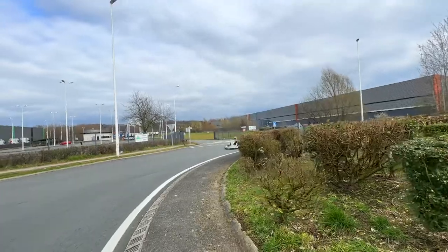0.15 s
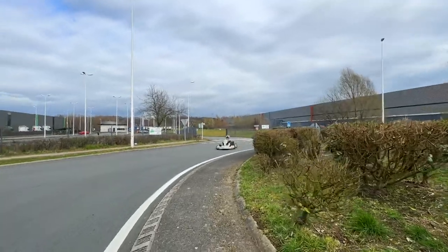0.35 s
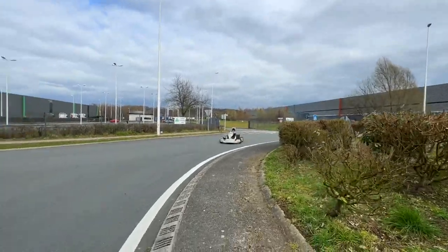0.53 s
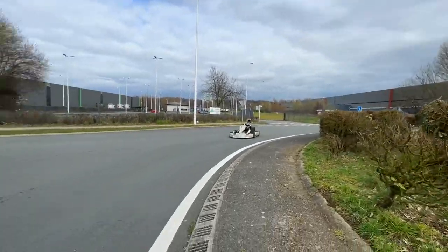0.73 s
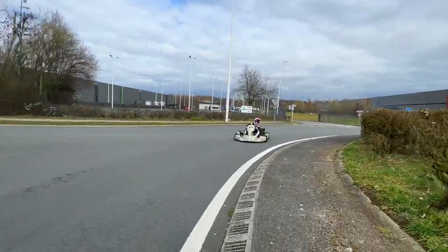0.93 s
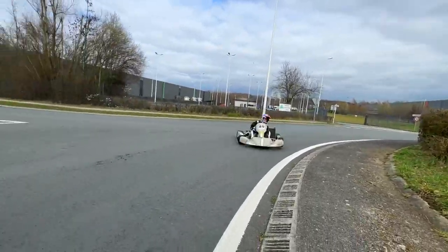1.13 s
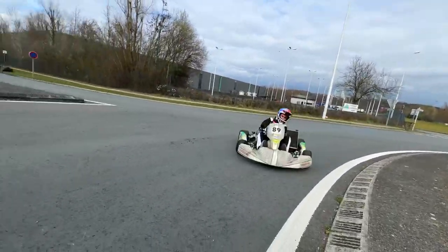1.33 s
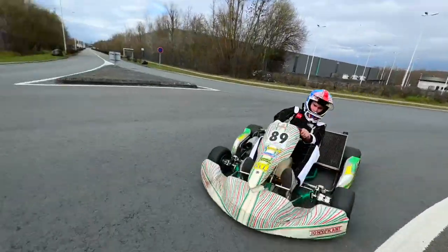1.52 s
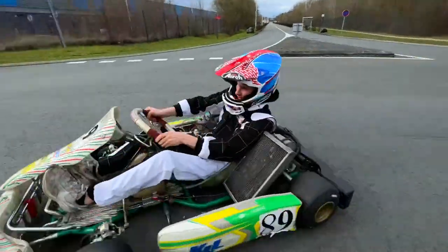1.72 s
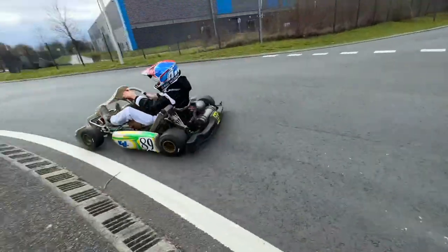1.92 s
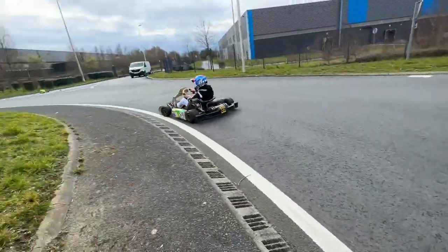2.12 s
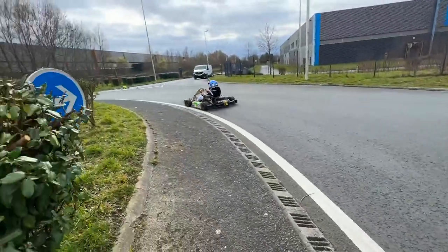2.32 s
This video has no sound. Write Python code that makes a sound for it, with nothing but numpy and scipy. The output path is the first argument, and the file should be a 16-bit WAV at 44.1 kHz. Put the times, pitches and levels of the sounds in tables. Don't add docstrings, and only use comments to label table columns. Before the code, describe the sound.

Racing kart on an open asphalt bend, heard from the kerb on a phone: distant sputtering, sudden throttle, loud raspy pass with tiny tyre squeals, then a falling note that picks up again as it leaves.

```python
import sys
import numpy as np
from scipy import signal
from scipy.fft import rfft, irfft, next_fast_len
from scipy.io import wavfile

SR = 44100
rng = np.random.default_rng(int(sys.argv[2]) if len(sys.argv) > 2 else 0)


def persist_wave(psi):
    counts = np.round(np.clip(psi, -1, 1) * 32767).astype(np.int16)
    wavfile.write(sys.argv[1], SR, np.atleast_2d(counts).T)


def rack_gain(trim_db):
    fader = np.asarray(trim_db, float)
    return 10 ** (fader / 20)


N = 104031
PADDED = next_fast_len(N)


def in_time(rows):
    s, *columns = np.transpose(rows)
    return [np.interp(np.arange(N) / SR, s, c) for c in columns]


def at_hz(points, hz):
    p = np.array(points)
    return np.interp(np.log(hz + 1e-3), np.log(p[:, 0] + 1e-3), p[:, 1])


def rms_one(x):
    return x / np.sqrt(np.mean(x ** 2) + 1e-20)


def drift(rate_hz):
    pole = np.exp(-80 * np.pi * rate_hz / SR)
    white = rng.standard_normal(N // 40 + 1002)
    slow = signal.lfilter([1], [1, -2 * pole, pole * pole], white)[1000:]
    limited = 2.5 * np.tanh(rms_one(slow) / 2.2)
    return np.interp(np.arange(N) / 40, np.arange(len(slow)), limited)


def noise(spectrum, gate, patchy_db):
    # frequency in Hz, share of noise power common to both ports.
    common_share = [(30, .15), (100, 0.83), (300, 1), (700, 0.48), (1500, 0.47), (4000, 0.34), (8000, 0.42),
                    (12000, 0.27)]
    hz = np.fft.rfftfreq(PADDED, 1 / SR)
    lowest, highest = spectrum[0][0], spectrum[-1][0]
    shape = rack_gain(at_hz(spectrum, hz)) * (hz > lowest) * (hz < highest)
    share = np.clip(at_hz(common_share, hz), 0, 1)
    split = np.sqrt([share, 1 - share, 1 - share])
    coloured = rfft(gate * rng.standard_normal((3, N)), PADDED) * shape * split
    octave = np.log2(hz + 1)
    together = drift(11)
    out = np.zeros((3, N))
    for centre in np.arange(np.floor(np.log2(lowest)), np.log2(highest) + 1, 1):
        band = np.clip(1 - abs(octave - centre), 0, 1)
        patches = rack_gain(patchy_db * (0.75 * together + drift(16.3)))
        out += irfft(coloured * band, PADDED)[:, :N] * patches
    return out / np.sqrt(np.mean(out[0] ** 2 + out[1] ** 2))


def tyre_rumble():
    # frequency in Hz, density in dB per Hz.
    road_spectrum = [(13, -51), (22, -35), (75, -7.5), (129, -13), (170, -12), (220, -60.5), (370, -120)]
    # time in seconds, level in dB.
    roll = [
        (0.04, -57),
        (0.13, -61),
        (0.36, -54),
        (0.46, -52.5),
        (1.26, -51.5),
        (1.29, -35.5),
        (1.5, -44),
        (1.56, -37),
        (2.36, -53),
    ]
    roll_db, = in_time(roll)
    return rack_gain(roll_db + 4.5) * noise(road_spectrum, 1, patchy_db=2.5)


def tyre_scrubs():
    # start in seconds, length in seconds, pitch in Hz, level in dB.
    squeals = [
        (1.815, .065, 2600, -24),
        (1.565, .045, 2500, -27),
    ]
    half_width_hz = 160
    out, t = np.zeros(N), np.arange(N) / SR
    for start, length, hz, db in squeals:
        edges = [hz - half_width_hz, hz + half_width_hz]
        sos = signal.butter(2, edges, "band", fs=SR, output="sos")
        squeal = rms_one(signal.sosfilt(sos, rng.standard_normal(N)))
        swell = np.interp(t - start, [0, .02, length, length + 0.0098], [0, 1, 1, 0])
        out += rack_gain(db) * swell * squeal
    return out


def chain_and_intake_hiss(gate, rasp_db, hiss_db, top_db):
    # frequency in Hz, density in dB per Hz.
    hiss_spectrum = [(2800, -22), (4300, -3), (5200, -3.5), (7000, -6), (10000, -3.5), (13000, -2),
                     (16000, -4)]
    hiss = rack_gain(rasp_db) * noise(hiss_spectrum, gate, patchy_db=1.1)
    split_hz = 11500
    low = signal.butter(8, split_hz, "low", fs=SR, output="sos")
    high = signal.butter(8, split_hz, "high", fs=SR, output="sos")
    body = rack_gain(hiss_db + 6.5) * signal.sosfilt(low, hiss)
    top = rack_gain(top_db + 10.5) * signal.sosfilt(high, hiss)
    return body, top


def exhaust_rasp(gate, rasp_db):
    # frequency in Hz, density in dB per Hz.
    rasp_spectrum = [(71, -76), (120, -27.5), (227, -7.5), (317, -13.5), (453, -10), (578, -12.5),
                     (710, -12.5), (2390, -14.5), (10500, -32), (13600, -86.5), (22000, -120)]
    return rack_gain(rasp_db + 3.0) * noise(rasp_spectrum, gate, patchy_db=1.5)


def pipe_db(hz, ring_db):
    chamber = (2 + ring_db) / (1 + (2 * (hz - 1093) / 210) ** 2)
    stinger = 3 / (1 + (2 * (hz - 2450) / 900) ** 2)
    return chamber + stinger


def exhaust(rate_hz, turns):
    # time in seconds, exhaust note in dB, second order in dB, upper orders in dB.
    drive = [(0.04, -39, -36, -42), (0.2, -34.5, -42.5, -45.5), (0.46, -39.5, -39, -32),
             (0.51, -25, -37.5, -31.5), (0.78, -25, -20.5, -30.5), (0.98, -23.5, -20.5, -27),
             (1.27, -13.5, -18.5, -21.5), (1.38, -19.5, -25, -19), (1.44, -13, -19.5, -24),
             (1.61, -19, -25, -21), (1.64, -14, -18, -31), (1.78, -21, -25, -19.5), (1.81, -17, -26, -19),
             (1.87, -30.5, -42, -23), (1.93, -24, -20.5, -30.5), (1.98, -25.5, -31.5, -29.5),
             (2.3, -30.5, -26.5, -25.5), (2.36, -60, -40, -33)]
    # time in seconds, how hard the chamber rings in dB, unevenness of the path as a factor.
    ring = [(.04, -3, 2.2), (.285, -2, 2.2), (.31, 15, 1.2), (.46, 14, 1.6), (.5, 1, 1.6), (.6, 0, 1.0),
            (1.25, 0, .9), (1.4, 2, 2.4), (2.06, 0, 2.4), (2.2, 2, 1.1), (2.36, 3, 1.1)]
    # multiple of the firing rate, level in dB.
    strong_orders = [
        (1, 1),
        (2, 0),
        (3, -6),
        (4, -8),
    ]
    upper_orders = [(k, -11.5 - (k - 5)) for k in range(5, 17)]
    drive_db = in_time(drive)
    ring_db, uneven = in_time(ring)
    sputter = 3.5 * np.clip((180 - rate_hz) / 30, 0, 1) * drift(38)
    out = np.zeros((3, N))
    for k, order_db in list(strong_orders) + upper_orders:
        flicker = uneven * 1.3 * min(k + 0.46, 3) ** .5 * drift(18)
        throttle_db = drive_db[min(int(k), 3) - 1]
        level = rack_gain(order_db + pipe_db(k * rate_hz, ring_db) + throttle_db + sputter + flicker)
        phase = 2 * np.pi * k * turns + 0.28 * uneven * k ** .5 * drift(11.2) + 0.795 * k
        out[0] += level * np.sin(phase)
        out[1 + int(k) % 2] += 0.18 * min(k, 4) * level * np.sin(phase + 3.04 * drift(6.1))
    return np.sqrt(2) * out


def ports(common, left, right):
    # frequency in Hz, left minus right in dB.
    balance = [(60, 4), (150, 1), (380, -2.0), (950, -9.5), (2380, -11), (5980, -0.5), (15000, -2.5)]
    # frequency in Hz, lead of the left port in radians.
    lead = [(0, 0.5), (4480, -0.6), (6550, 8.5), (7320, 16.5), (9650, 17), (10400, 17), (13600, 31.5),
            (16600, 0)]
    hz = np.fft.rfftfreq(PADDED, 1 / SR)
    lead_hz, lead_rad = np.transpose(lead)
    half = rack_gain(at_hz(balance, hz) / 2) * np.exp(.5j * np.interp(hz, lead_hz, lead_rad))
    return irfft(rfft([common + left, common + right], PADDED) * [half, 1 / half], PADDED)[:, :N]


def scene():
    # time in seconds, firing rate in Hz.
    speed = [(0.04, 178.6), (0.25, 135.6), (0.38, 133.9), (0.49, 198.3), (0.52, 211), (0.78, 236.9),
             (1.25, 239.1), (1.36, 218.2), (1.43, 227.3), (1.6, 222), (1.7, 200.4), (1.77, 210.4),
             (1.91, 199.7), (1.99, 172.7), (2.05, 163.3), (2.16, 197.1), (2.2, 188.8), (2.36, 229.5)]
    # time in seconds, rasp in dB, hiss in dB re rasp, top hiss in dB re rasp.
    load = [(0.04, -39.5, -25, -27), (0.37, -40.5, -6.5, -15.5), (0.49, -30, -6, -16.5),
            (0.98, -29, -5.5, -17), (1.05, -25, -8, -18), (1.4, -22, -1.5, -15.5),
            (1.6, -18.5, -6.5, -15.5), (1.65, -21.5, -2, -13.5), (1.74, -19.5, .5, -7.5),
            (1.86, -21.5, -5, -8.5), (1.91, -30, 0, -10), (1.99, -29, -6.5, -21), (2.015, -27, -2.5, -6.5),
            (2.055, -32, -7.5, -17), (2.09, -28, -3, -1), (2.18, -31, -1, -5.5), (2.25, -25.5, -6.5, -7),
            (2.36, -31.5, -3, -3.5)]
    rate_hz, = in_time(speed)
    rasp_db, hiss_db, top_db = in_time(load)
    turns = np.cumsum(rate_hz + 1.0 * drift(9.5)) / SR
    gate = 1 + 0.11 * np.cos(2 * np.pi * turns)
    hiss, top = chain_and_intake_hiss(gate, rasp_db, hiss_db, top_db)
    kart = tyre_rumble() + hiss + exhaust_rasp(gate, rasp_db) + exhaust(rate_hz, turns)
    kart[0] += tyre_scrubs()
    return ports(*kart) + top[0] + top[1:]


def top_cut(x):
    return signal.sosfilt(signal.butter(12, 17080, fs=SR, output="sos"), x)


def record(dry):
    hz = np.fft.rfftfreq(PADDED, 1 / SR)
    left, right = rfft(1.175 * np.tanh(dry / 1.478), PADDED)
    gap_edges = [10100, 11100, 11500, 12500]
    mid_gain = rack_gain(np.interp(hz, gap_edges, [0, -40, -40, 0])) * (hz < 15850)
    side_gain = rack_gain(np.interp(hz, gap_edges, [0, -5, -5, 3])) * (hz < 13550)
    mid = (left + right) / 2 * mid_gain
    side = (left - right) / 2 * side_gain
    stereo = irfft([mid + side, mid - side], PADDED)[:, :N]
    fade_in = np.clip((np.arange(N) / SR - .0365) / 0.00084, 0, 1)
    return top_cut(stereo * fade_in)


dry = scene()
out = record(dry)
persist_wave(out)
```